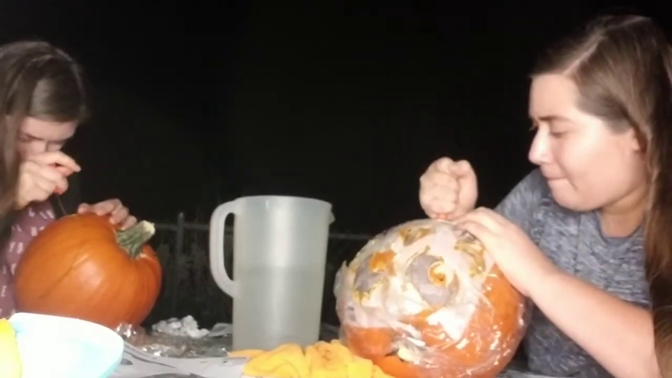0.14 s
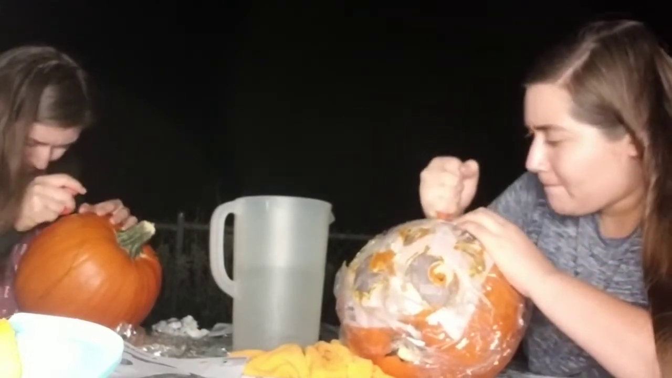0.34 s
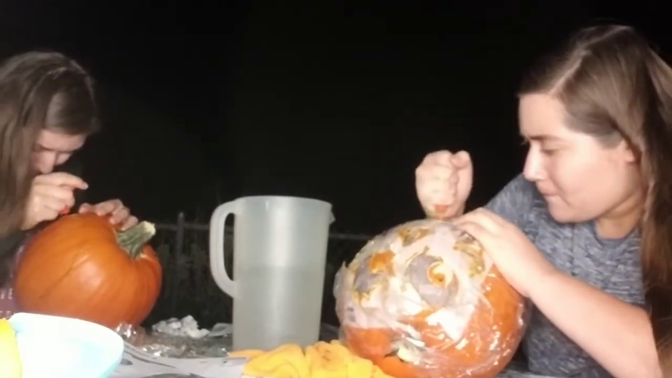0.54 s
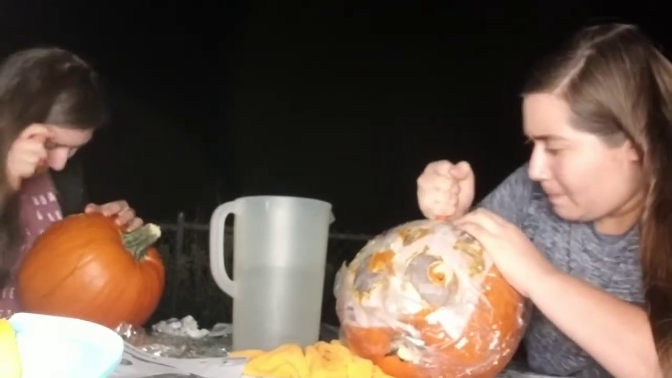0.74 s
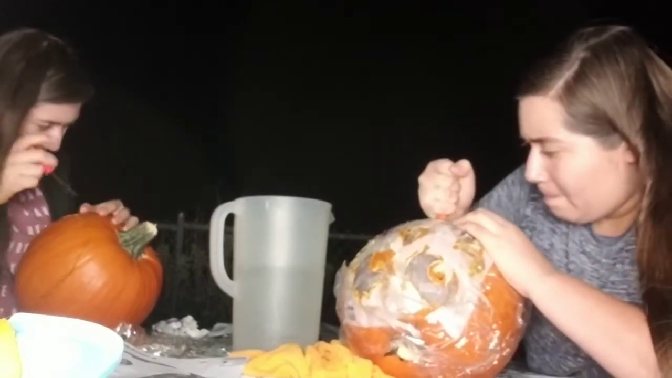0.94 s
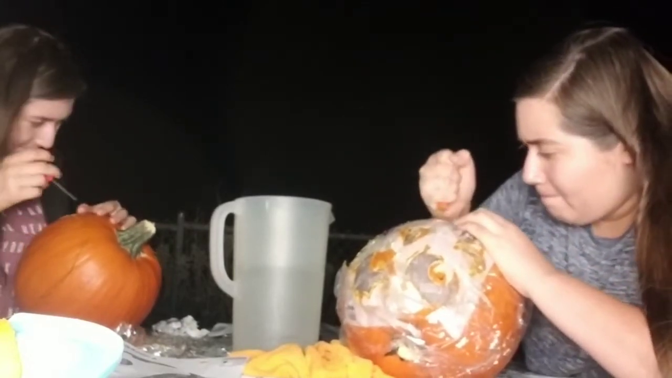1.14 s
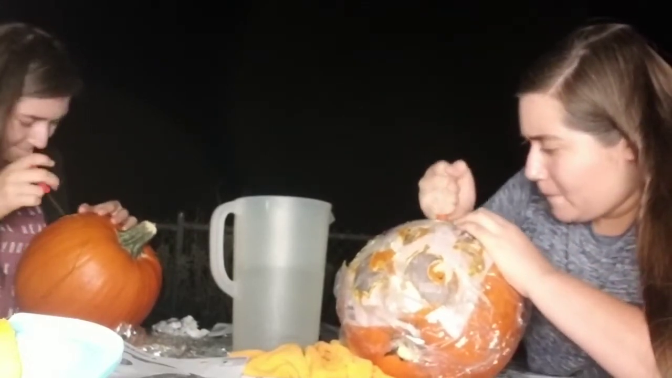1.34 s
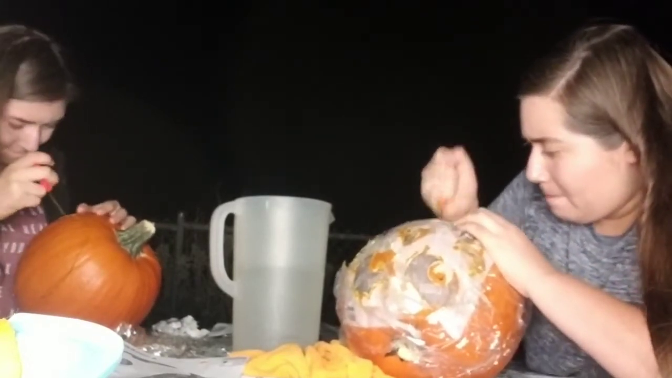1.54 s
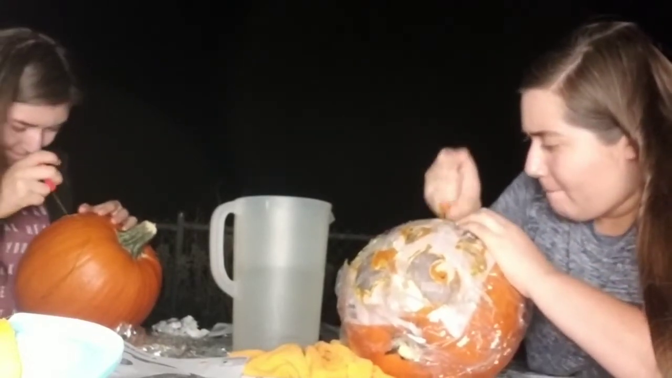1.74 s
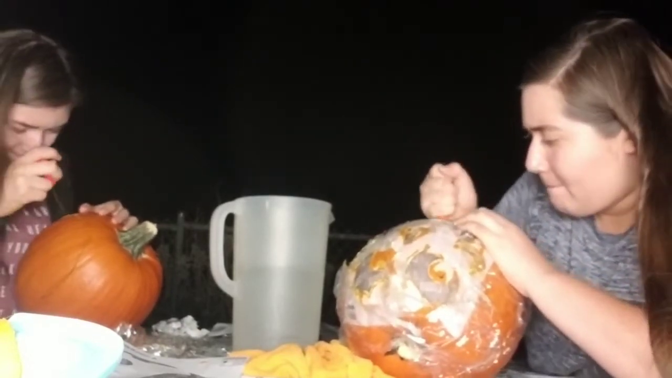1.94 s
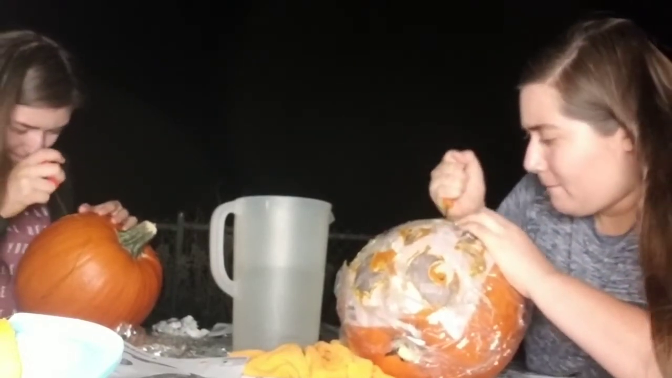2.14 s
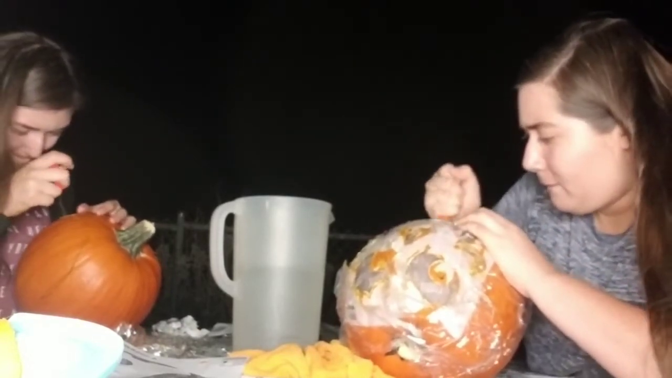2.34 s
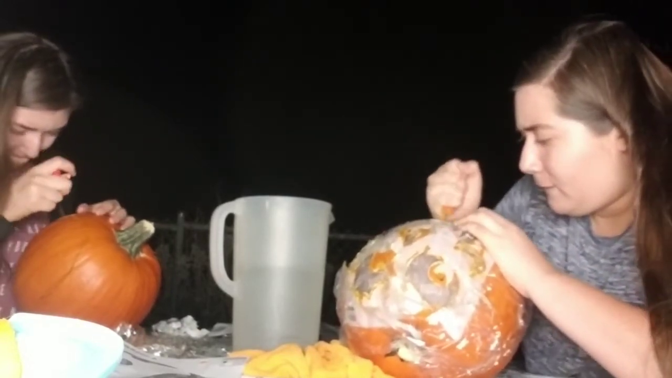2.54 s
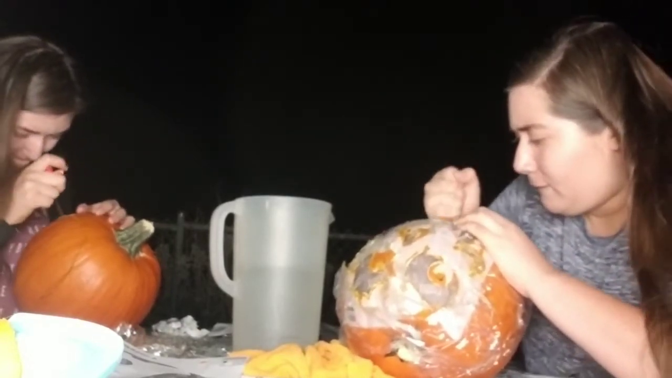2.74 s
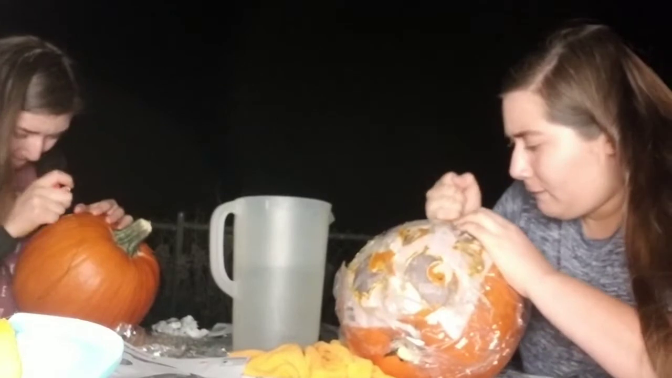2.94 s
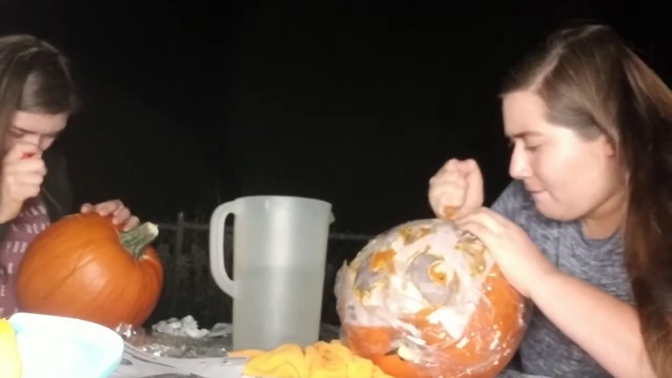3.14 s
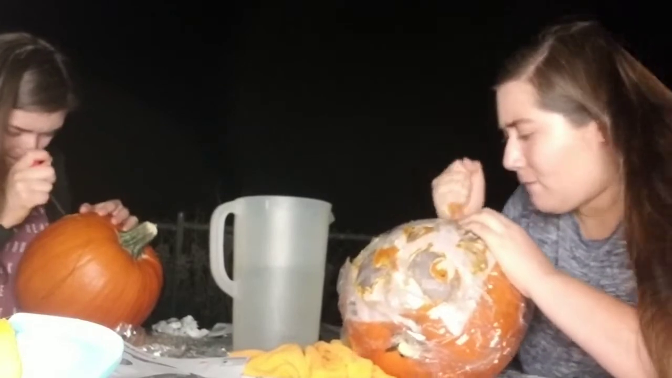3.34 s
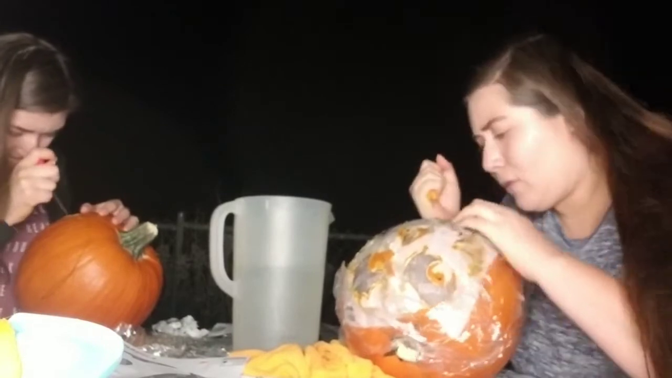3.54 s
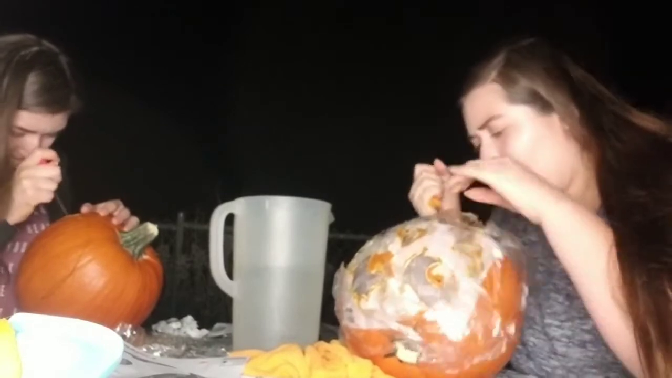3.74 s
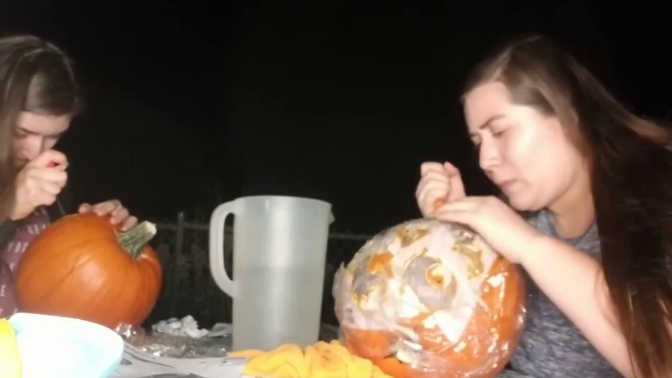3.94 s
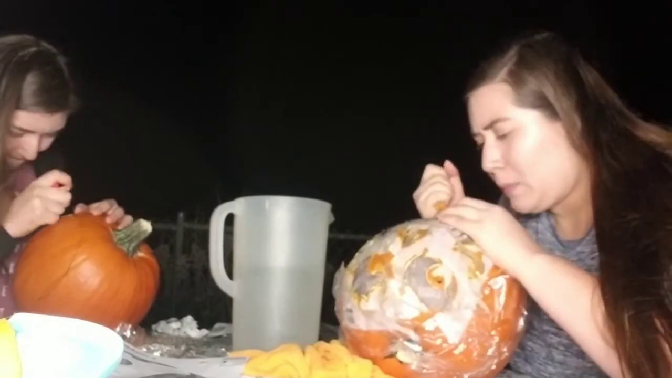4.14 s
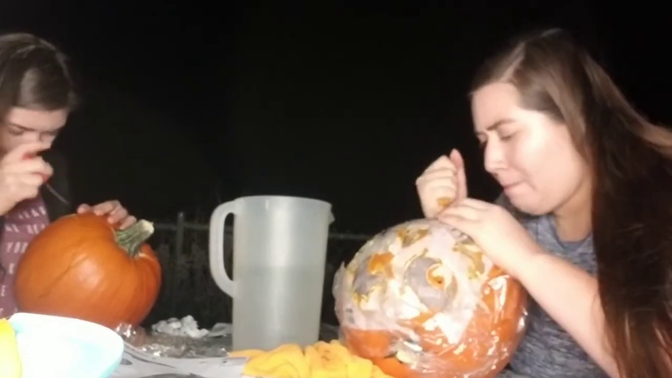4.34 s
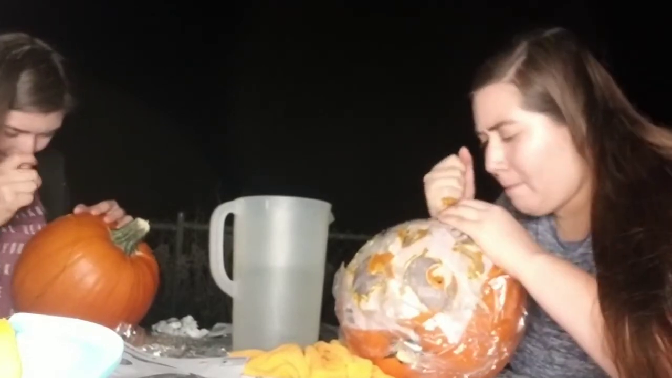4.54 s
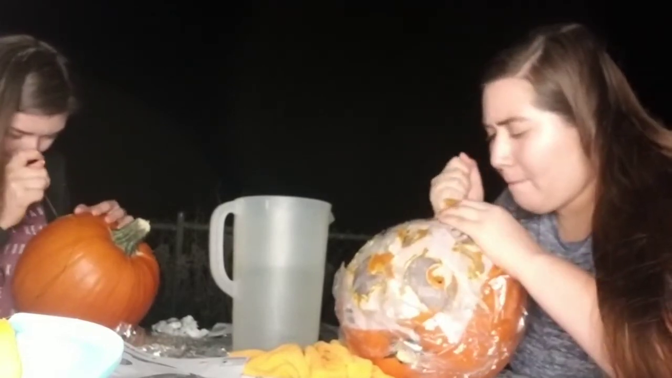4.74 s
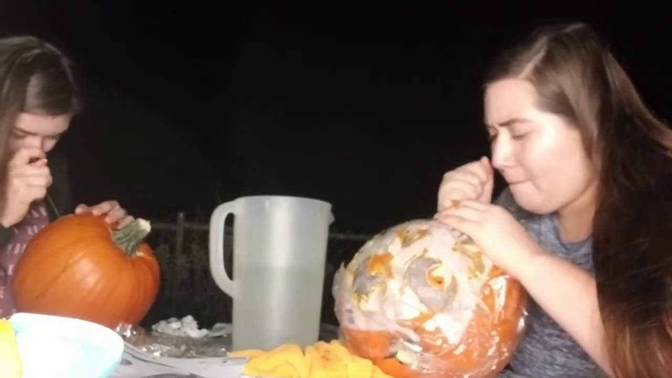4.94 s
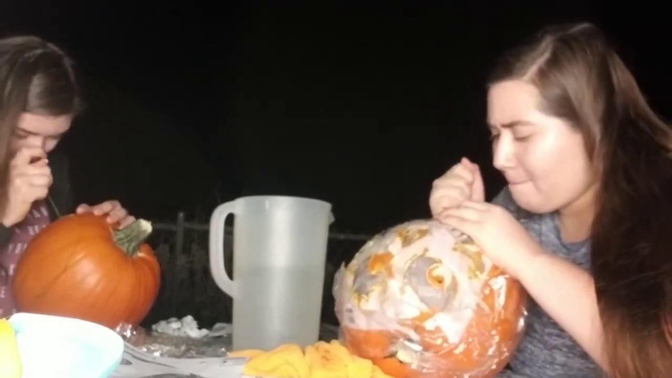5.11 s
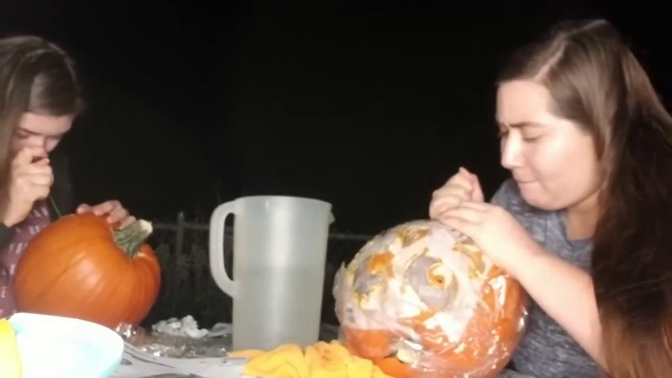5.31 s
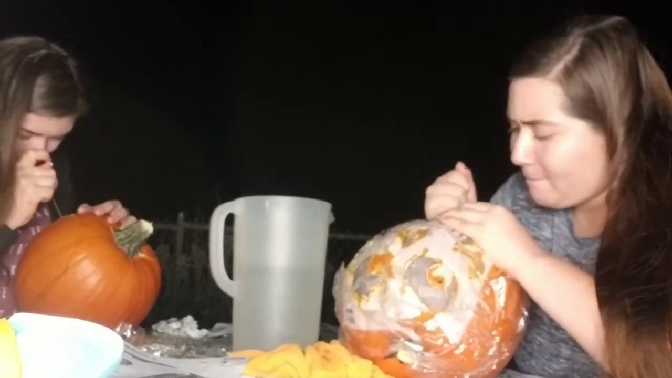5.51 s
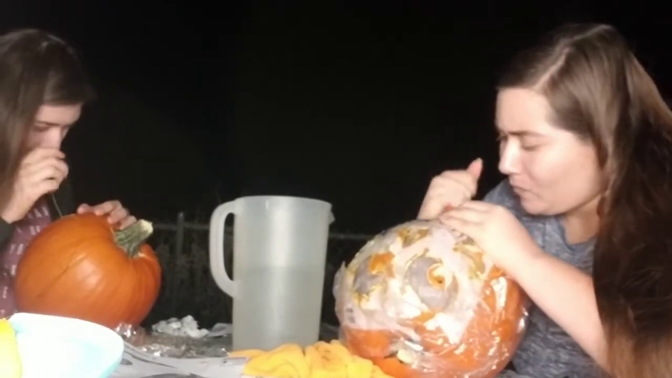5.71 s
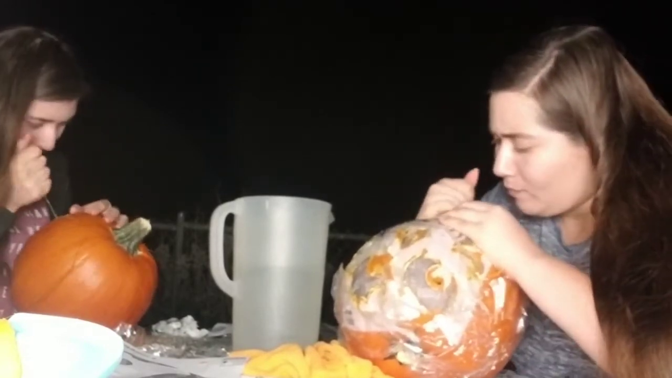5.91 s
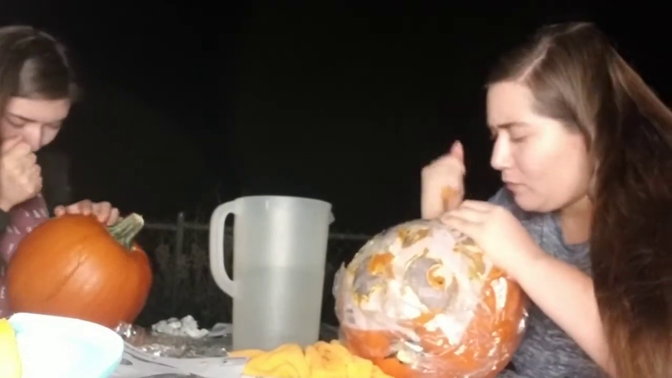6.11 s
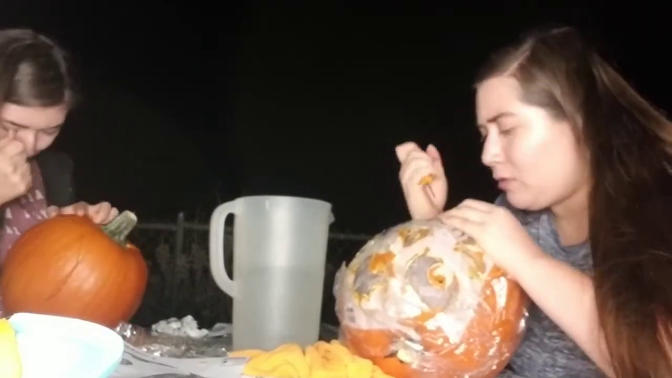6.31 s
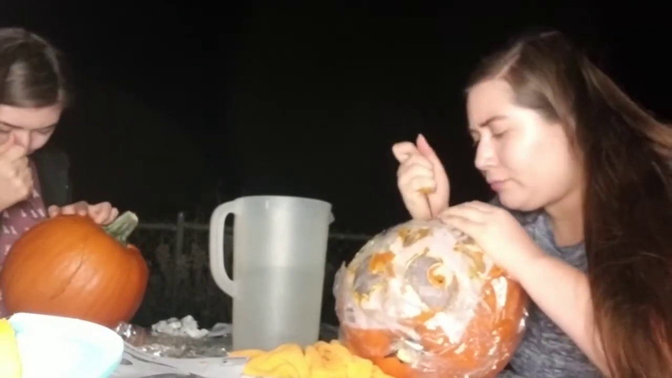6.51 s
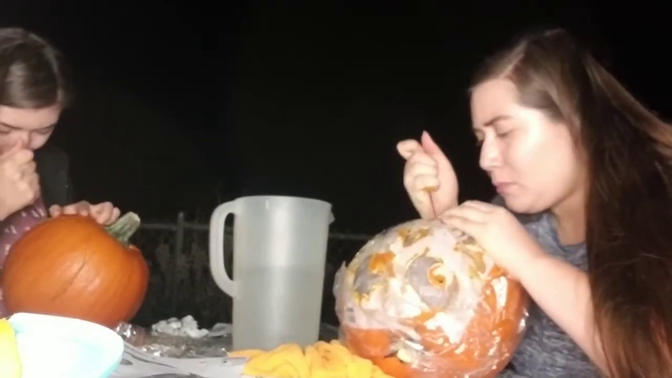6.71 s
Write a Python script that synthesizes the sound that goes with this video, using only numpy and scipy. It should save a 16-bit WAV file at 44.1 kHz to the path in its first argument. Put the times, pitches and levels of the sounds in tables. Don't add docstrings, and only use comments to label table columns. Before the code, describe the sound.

Close, dry stereo sound of pumpkin carving on an outdoor table. Uneven little saw strokes knock and rasp, swelling into a quick, woody-hollow run, then thinning. A cluster of crisp snaps and handling noises follows, then a mostly quiet gap with thin crickets and low distant rumble. Soft low rubs and several lighter saw strokes finish it, with no reverberation.

```python
import sys
import numpy as np
from scipy import signal
from scipy.fft import rfft, irfft, next_fast_len
from scipy.io import wavfile
from scipy.ndimage import uniform_filter1d

SR = 44100
rng = np.random.default_rng(int(sys.argv[2]) if len(sys.argv) > 2 else 0)


def int16_out(signal):
    q = np.round(np.clip(np.atleast_2d(signal).T, -1, 1) * 32767)
    wavfile.write(sys.argv[1], SR, q.astype(np.int16))


def linear_from_db(decibels):
    return 10 ** (np.asarray(decibels, float) / 20)


N = 298557
TIME = np.arange(N) / SR


def level(x, db):
    return x * linear_from_db(db) / np.sqrt(np.mean(np.abs(x) ** 2))


def ports(left_db, right_db):
    return linear_from_db(np.array([[left_db], [right_db]]))


def noise():
    return rng.standard_normal((2, N))


def ring(x, modes, shift=1):
    size = next_fast_len(x.shape[-1], real=True)
    hz = (np.arange(size // 2 + 1) * SR / size + 1e-9) / shift
    power = 0
    for mode_hz, width_hz, db in modes:
        detune = (hz / mode_hz - mode_hz / hz) * mode_hz / width_hz
        power = power + (linear_from_db(db) / (1 + 1j * detune) ** 2) ** 2
    return irfft(rfft(x, size) * np.sqrt(np.abs(power)), size)[..., :x.shape[-1]]


def walk(rate_hz, channels=1):
    k = int(SR / rate_hz)
    held = np.repeat(rng.standard_normal((channels, N // k + 1)), k, axis=1)
    return uniform_filter1d(uniform_filter1d(held, k), k)[:, :N]


def swell(centre_s, ms, edge, skirt_db=-60, rise=1.78):
    cut = slice(max(int((centre_s - ms / 250) * SR), 0), min(int((centre_s + ms / 250) * SR), N))
    u = (TIME[cut] - centre_s) * 2000 / ms
    core = .5 ** (np.abs(u) ** np.where(u < 0, rise * edge, edge))
    skirt = linear_from_db(skirt_db) * np.exp(-(u / 8.9) ** 2) * np.hanning(len(u))
    return cut, u, core + skirt


def patchy(x, modes, swing_db, shift=1):
    return level(sum(linear_from_db(db) * ring(x, [mode], shift) for mode, db in zip(modes, swing_db)), 0)


def bursts(rows, share):
    out = np.zeros((2, N))
    for (start_s, db, hz, ms), hiss in zip(rows, rng.standard_normal((len(rows), 2, SR))):
        cut, u, shape = swell(start_s + ms / 2000, ms, edge=1.75)
        buzz = ring(hiss[:, :len(u) + 2048], [(hz, share * hz, 0)])
        out[:, cut] += shape * level(buzz, db - 9.0)[:, :len(u)]
    return out


def loose(rows, scatter_rad):
    return .2 + scatter_rad * rng.standard_normal(len(rows))


LOOSE_SCATTER_RAD = .9


def drum(rows, wobble, edge, modes, rough_db):
    out, halo = np.zeros((2, N)), np.zeros(N)
    waver, uneven = wobble * walk(90)[0], linear_from_db(.9 * walk(120)[0])
    for centre_s, db, ms, start_hz, end_hz, lead_rad in rows:
        cut, u, shape = swell(centre_s, ms, edge, rise=1.17)
        hz = ((start_hz + end_hz) / 2 + (end_hz - start_hz) * np.tanh(u)) * (1 + waver[cut])
        phase = 2 * np.pi * np.cumsum(hz) / SR + lead_rad / 2 * np.array([[1], [-1]])
        out[:, cut] += np.sqrt(2) * linear_from_db(db) * shape * uneven[cut] * np.cos(phase)
        cut, u, shape = swell(centre_s, 1.88 * ms, edge=1.7)
        halo[cut] += linear_from_db(db) * shape
    rough = noise() + 0.89 * rng.standard_normal(N)
    return out + halo * level(ring(rough, modes), rough_db)


def glide(row, glide_hz, lead_rad):
    centre_s, db, ms, tooth_hz = row[:4]
    return centre_s, db, ms, tooth_hz - glide_hz / 2, tooth_hz + glide_hz / 2, lead_rad


# centre_s [s], level_db [dB], length_ms [ms], tooth_hz [Hz], glide_hz [Hz]
PUSHES = [(.172, -32, 19.3, 305.4, 7), (.226, -34.5, 11.5, 283.6, 3.5), (0.502, -35, 18, 235.6, -65.5),
          (0.525, -27, 11.6, 286, 26.5), (.82, -38, 10, 311.5, -4.5), (0.839, -35, 29.2, 328.2, 6.5),
          (1.153, -28.5, 22, 303.4, -40.5), (1.167, -34.5, 7, 212.6, -17),
          (1.392, -37.5, 27.8, 261.2, -0.5), (1.431, -29, 16.3, 288.3, 23.5),
          (1.447, -28.5, 8.4, 205, -29.5), (1.577, -37, 9.4, 310.5, -29), (1.593, -25.5, 13.9, 276.4, 40),
          (1.711, -28.5, 12.1, 234, -8.5), (1.723, -33, 8.4, 352, -14), (1.734, -33, 14.4, 270, 36),
          (1.968, -16, 20.4, 313.4, -12), (2.095, -18, 18.4, 300.5, 11), (2.207, -23.5, 22.8, 256.7, 34.5),
          (2.311, -32, 9.6, 341.4, -8), (2.323, -20.5, 18, 304.4, -37.5), (2.342, -41, 10, 326, -5),
          (2.457, -21, 19.2, 322, -2), (2.474, -37, 8.84, 331, -3), (2.722, -32.5, 17, 301.4, -3.5),
          (2.845, -24.5, 19, 222.7, -15.5), (3.09, -25.5, 16, 309.4, 26.5), (3.21, -31, 9.9, 264.6, 2),
          (3.223, -22, 16.8, 235.8, 21), (3.466, -28.5, 11, 274, -7), (3.478, -33.5, 7.7, 289.6, 0),
          (3.585, -21, 18.2, 221.3, -27.5), (3.606, -35, 10, 281, -24), (5.8115, -27, 12, 248.8, 9),
          (5.82, -28.5, 9.4, 311.6, 44.5), (6.006, -34, 6.1, 256, -4.5), (6.021, -27, 16.9, 268.4, -18),
          (6.164, -32, 20.7, 243.5, -30.5), (6.414, -30.5, 16.5, 201.9, -31)]
# centre_s [s], left_lead_rad [rad]
ROCKS = [(.5, -1.9), (2.322, -.4), (.525, -1.1), (1.43, .5), (1.448, 1.3), (1.968, -.8), (2.096, -2.2),
         (2.722, -1.3), (3.09, 2.4), (3.21, 2.1), (3.223, 1.6), (3.466, -.7), (3.478, -1.1), (6.164, .9),
         (6.414, -2)]
# centre_s [s], level_db [dB], length_ms [ms], tooth_hz [Hz]
PULLS = [(0.585, -50, 17, 324), (0.606, -48.5, 18.6, 246), (.623, -45.5, 22, 299.7),
         (.657, -39.5, 14.4, 261.3), (.691, -40, 13.2, 301.8), (0.787, -50, 31, 315.4), (1.1, -54, 24, 322),
         (1.539, -67, 28, 323), (1.676, -48.5, 25, 224), (1.917, -51.5, 15.6, 281), (2.055, -50, 30, 292.6),
         (2.256, -49, 12, 288), (2.425, -44.5, 24, 265), (2.542, -52, 16, 272.5), (2.701, -38, 15.5, 302),
         (2.786, -49.5, 16, 269), (2.812, -53, 13.7, 248), (3.17, -53, 12, 300), (3.442, -43.5, 14.3, 340),
         (5.994, -37.5, 8, 286), (2.932, -57, 22, 262), (2.973, -43, 14.2, 280), (3.287, -51, 13, 256),
         (3.352, -42, 5.7, 238), (4.468, -59, 16, 225), (4.479, -53.5, 16, 337.6), (4.49, -52, 14, 402),
         (4.515, -59, 12, 248.4), (4.61, -62.5, 25, 291.5), (3.265, -44, 13, 280), (0.924, -58, 30, 287.4),
         (4.501, -41.5, 6.5, 306), (5.402, -50, 15, 223.7), (5.515, -46.5, 21, 294.8),
         (5.683, -51.5, 7.5, 228.4), (5.847, -48, 16.5, 300), (6.118, -51, 29, 233.7),
         (6.494, -51, 55, 320)]
# pitch_hz [Hz], width_hz [Hz], level_db [dB]
SHELL = [(154, 26, -3.5), (222.6, 51, 0.5), (309.2, 48.7, 1.5), (371.4, 48, -7.5), (544, 84, -28.5)]


def bites():
    rocks = np.array(ROCKS)
    rocked = np.abs(np.array(PUSHES)[:, :1] - rocks[:, 0]) < .005
    leads = loose(PUSHES, scatter_rad=.15) + rocked @ rocks[:, 1]
    pushes = [glide(row, row[4], lead) for row, lead in zip(PUSHES, leads)]
    pulls = [glide(row, 11.8, lead) for row, lead in zip(PULLS, loose(PULLS, LOOSE_SCATTER_RAD))]
    return (drum(pushes, wobble=0.047, edge=2.63, modes=SHELL, rough_db=-16.0)
            + drum(pulls, wobble=0.082, edge=1.8, modes=SHELL, rough_db=-3.5))


# centre_s [s], length_ms [ms], level_db [dB], steel_over_rind_db [dB]
CUTS = [(0.173, 28, -69.5, 0), (0.233, 24, -67.5, -5), (0.511, 38, -60.5, 1.5), (0.607, 36, -70, 2.5),
        (0.644, 40, -61, 6.5), (0.683, 34, -68, 2.5), (0.836, 36.5, -64, 2), (1.109, 33, -68.5, 5.5),
        (1.157, 29, -65.5, -0.5), (1.395, 48, -72, 1.5), (1.444, 30, -64.5, 2), (1.593, 18, -59, -3),
        (1.725, 39, -61.5, 1), (1.972, 30, -60, 1), (2.099, 36, -61.5, 1.5), (2.21, 25.2, -57, 1),
        (2.325, 33, -61.5, 5), (2.461, 30, -63.5, 1.7), (2.712, 35, -65.5, 2.5), (2.85, 46, -64.5, 3),
        (2.972, 24, -69, 3.5), (3.09, 24, -65.5, -2.5), (3.221, 19, -61, -5.5), (3.281, 36, -68, 7.5),
        (3.353, 23.5, -65.5, -5), (3.478, 31, -69, -0.5), (3.589, 24, -62.5, -1), (5.521, 33, -66.5, 1),
        (5.819, 12.3, -61.5, -2.5), (5.845, 31, -64, -5), (5.999, 17, -75, 4.5), (6.021, 25.6, -61.5, -1.5),
        (6.16, 26, -68.5, 1.5), (6.415, 24, -67, 1)]
# centre_s [s], length_ms [ms], level_db [dB], steel_over_rind_db [dB]
WIPES = [(0.784, 27, -71, 2), (1.904, 33, -78.5, 3.5), (2.398, 55, -73, 2), (2.532, 49, -73, 2),
         (1.624, 27, -78, 3.5), (3.381, 28, -74.5, 7), (3.42, 38, -76, -0.5), (3.446, 7.6, -71.5, 14),
         (3.678, 18, -77.5, -0.5), (3.755, 84, -78.5, 4), (3.83, 79, -79.5, 1.5), (3.912, 28, -62, 5.5),
         (3.991, 125, -68, 6), (4.111, 51, -67, 1.5), (4.49, 41, -60.5, 3), (5.96, 65, -71.5, 1.5),
         (6.125, 25, -73, -6), (6.286, 11, -70, -4), (6.523, 33, -70, -1.5), (5.395, 42, -78, -3),
         (6.638, 22.6, -65.5, -3)]
# time_s [s], level_db [dB]
PLACE = [(.2, 3), (.5, 5), (1.0, -7), (1.5, -2), (2.1, 5.5), (2.5, 6), (2.9, 6), (3.15, 2.5), (3.6, 2.5),
         (5.6, -33), (5.83, -8.5), (6.02, -12), (6.6, -6)]
# pitch_hz [Hz], width_hz [Hz], level_db [dB]
RIND = [(1072, 136, -2), (1376, 112, 1), (515, 110, 2), (1676, 410, -19), (940, 79, -24.5)]
# pitch_hz [Hz], width_hz [Hz], level_db [dB]
FLESH = [(2700, 420, 4.5), (3140, 330, -4.5), (4150, 2100, 4.5), (4560, 930, -2.5), (2290, 200, -5.5)]
# pitch_hz [Hz], width_hz [Hz], level_db [dB]
STEEL = [(5440, 1100, 0.5), (6600, 560, -3.5), (7625, 880, 6), (9000, 1100, -3), (11600, 6000, -8.5)]


def scrape():
    out = np.zeros((2, N))
    fibres = rng.standard_normal((3, 2, N)) * linear_from_db(.55 * rng.exponential(size=N) + 2.6 * walk(400))
    fibres[0] += 0.32 * fibres[0].mean(axis=0)
    flicker_db = (3.5 * walk(70, channels=15) + 2 * walk(25, channels=15)).reshape(3, 5, N)
    rows = [(*row, 0) for row in CUTS] + [(*row, -3) for row in WIPES]
    for (centre_s, ms, db, tilt_db, dull_db), chance in zip(rows, rng.standard_normal((len(rows), 3))):
        rind_db, flesh_db, steel_db = db - tilt_db + dull_db, db + 0.7, db + tilt_db - 1.74
        place_db = np.interp(centre_s, *np.transpose(PLACE))
        low, body, third = RIND[:3]
        rind = [(low[0], low[1], place_db), body, (third[0], third[1], third[2] + 0.19 * place_db)] + RIND[3:]
        top_hz, top_width_hz, top_db = STEEL[-1]
        steel = STEEL[:-1] + [(top_hz, top_width_hz, top_db + .5 * (steel_db - flesh_db))]
        cut, u, shape = swell(centre_s, ms, edge=2.14, skirt_db=-18.5)
        for k, (modes, part_db) in enumerate(((rind, rind_db), (FLESH, flesh_db), (steel, steel_db))):
            sound = patchy(fibres[k][:, cut], modes, flicker_db[k][:, cut], shift=1 + 0.043 * chance[k])
            out[:, cut] += linear_from_db(part_db) * shape * sound
    return out * ports(-1.5, 1.5)


# start_s [s], peak_db [dB], pitch_hz [Hz], length_ms [ms]
RINGS = [(.495, -54, 1037, 35), (1.385, -58.5, 1400, 60), (1.575, -50, 1360, 27), (1.705, -56, 1380, 26),
         (1.955, -52.5, 1310, 28), (2.41, -60, 1430, 15), (2.695, -59.5, 1384, 38), (2.825, -54, 1370, 18),
         (3.575, -54, 1280, 28), (3.895, -56, 2950, 9.3), (6.005, -46.5, 1320, 18.6),
         (.49, -48.5, 2930, 37), (.5, -51, 3960, 26), (.618, -51.5, 2930, 64), (.82, -58, 2400, 28),
         (1.095, -58, 3000, 22), (1.15, -50.5, 2410, 14), (1.36, -60.5, 2630, 44), (2.315, -51, 4020, 27),
         (2.32, -53, 2700, 17.4), (2.445, -51, 3880, 24), (2.455, -50.5, 2700, 27),
         (2.695, -54.5, 3820, 30), (2.71, -59, 2780, 26), (3.265, -61, 3200, 30), (5.806, -52.5, 2780, 22),
         (5.835, -51, 2470, 15), (5.935, -64, 1390, 40), (6.01, -48, 2700, 21), (6.157, -54, 5400, 16),
         (6.278, -61, 2930, 13), (6.278, -66, 1430, 13), (6.402, -60.5, 2700, 25), (6.402, -51, 5270, 18.5),
         (6.512, -52, 4430, 22), (6.632, -54, 2380, 17)]


def tooth_rings():
    return bursts(RINGS, share=0.097)


# centre_s [s], level_db [dB]
JOLTS = [(0.235, -43), (0.534, -45), (0.657, -51), (0.832, -37), (1.151, -41), (1.256, -54.5), (1.439, -40),
         (1.598, -42), (1.724, -39), (1.919, -52.5), (1.979, -46.5), (2.074, -54.5), (2.198, -47),
         (2.443, -53), (2.982, -53.5), (3.093, -56), (3.234, -55.5), (3.351, -46.5), (3.481, -32.5),
         (3.503, -41.5), (3.596, -50.5), (3.67, -53.5), (3.898, -52.5), (3.953, -52), (4.018, -53.5),
         (4.583, -52.5), (5, -57), (5.408, -51.5), (5.63, -55), (5.819, -42), (5.931, -54), (6.165, -43.5),
         (6.296, -56), (6.413, -43)]


def table_jolts():
    table_hz = 105.18
    leads = loose(JOLTS, 1.4 * LOOSE_SCATTER_RAD)
    rows = [(s, db, 32 - 0.93 * (db + 44.5), table_hz, table_hz, lead) for (s, db), lead in zip(JOLTS, leads)]
    return drum(rows, wobble=0.046, edge=2.3, modes=[(table_hz, 60, 0), (170, 60, -6)], rough_db=-6.5)


# start_s [s], peak_db [dB], centre_hz [Hz]
SNAPS = [(0.227, -47, 2600), (.819, -56, 2980), (3.676, -47, 5140), (3.7227, -46, 6500),
         (3.8057, -38.5, 6700), (3.9018, -40, 6650), (3.9063, -41, 1980), (3.915, -33, 6500),
         (3.9327, -36, 9130), (3.9468, -37, 7200), (3.966, -52, 6500), (3.983, -43, 6000),
         (4.0092, -38, 6500), (4.095, -41, 7900), (4.105, -50, 9000), (4.115, -39.5, 9270),
         (4.13, -53, 9560), (4.4682, -61, 4800), (4.477, -56.5, 7000), (4.5022, -37, 8300),
         (5.871, -55, 8000), (5.889, -52, 7500), (6.518, -49, 4500)]


def snaps():
    out, t = np.zeros((2, N)), np.arange(300) / SR
    rise = t * 1000 / .5
    shape = rise * np.exp(1 - rise)
    partials = ((.6, .76), (1, 1), (.6, 1.24), (.3, 1.5))
    for (start_s, db, hz), turns in zip(SNAPS, rng.uniform(0, 2 * np.pi, (len(SNAPS), 4, 2, 1))):
        i = int(start_s * SR)
        cluster = sum(g * np.sin(2 * np.pi * ratio * hz * t + turn) for (g, ratio), turn in zip(partials, turns))
        out[:, i:i + 300] += linear_from_db(db - 10.5) * shape * cluster
    return out


# start_s [s], peak_db [dB], pitch_hz [Hz], length_ms [ms]
SQUEAKS = [
    (.028, -67, 2200, 34),
    (.059, -64.5, 1490, 25),
    (1.805, -60, 3600, 17),
    (3.664, -49.5, 2910, 16),
    (3.699, -60, 3240, 41),
    (3.802, -62, 2130, 28),
    (4.209, -65, 3520, 33),
    (5.56, -59.5, 625, 80),
    (5.85, -60.5, 610, 71),
]


def squeaks():
    return bursts(SQUEAKS, share=0.15)


# time_s [s], level_db [dB]
HANDS = [(0, 4.5), (.22, 8.5), (.53, -35), (.68, 6), (.9, 1), (1.39, -52), (1.55, -2.5), (1.94, -3.5),
         (2.13, 5.5), (2.36, 6.5), (2.53, -2), (3.04, 4.5), (3.47, 10), (3.94, 4), (4.54, -5), (5.07, -3.5),
         (6.03, 1.5), (6.77, 4.5)]


def hands_db():
    return np.interp(TIME, *np.transpose(HANDS))


def rub(busy_db):
    return linear_from_db(-66.5 + busy_db) * patchy(noise(), SHELL, 4.6 * walk(25, channels=5))


def rustle(busy_db):
    return linear_from_db(-87 + 1.07 * busy_db + 1.6 * walk(54)) * level(ring(noise(), STEEL + FLESH), 0)


# pitch_hz [Hz], width_hz [Hz], level_db [dB]
CRICKETS = [(4285, 76, -1.5), (4472, 71, -1), (4665, 89, -3.5)]
# centre_s [s], length_ms [ms]
LULLS = [(.222, 63), (.4, 88), (.765, 54), (.99, 116), (1.24, 86), (1.375, 89), (1.659, 52), (2.534, 59),
         (2.95, 45), (3.06, 61), (3.155, 36), (4.12, 38), (4.235, 88), (4.385, 60), (4.56, 49), (4.72, 41),
         (4.8, 84), (4.88, 22), (4.98, 110), (5.07, 21), (5.161, 49), (5.285, 61), (5.36, 26), (5.46, 50),
         (5.7, 92), (5.875, 46), (6.07, 72), (6.26, 130), (6.465, 36), (6.575, 9.7), (6.72, 61)]
# start_s [s], peak_db [dB], pitch_hz [Hz], length_ms [ms]
CHIRPS = [(.05, -65, 4230, 27), (.14, -61, 4460, 31), (.27, -68, 4370, 70), (.67, -54, 4250, 37),
          (.875, -62, 4330, 30), (1.09, -63, 4300, 32), (1.29, -70, 4240, 50), (1.5, -72, 4300, 37),
          (1.87, -64, 4310, 33), (2.38, -64, 4500, 20), (2.575, -66, 4260, 20), (3.0, -66.5, 4290, 20),
          (3.42, -60, 4300, 51), (3.62, -61.5, 4300, 38), (4.28, -72, 4270, 30), (4.325, -68, 4530, 25),
          (4.59, -64, 4490, 40), (4.61, -69, 4230, 40), (4.695, -68, 4250, 27), (4.83, -69, 4500, 32),
          (4.88, -65.5, 4270, 45), (5.03, -65, 4340, 22), (5.1, -69, 4270, 34), (5.19, -73, 4320, 58),
          (5.225, -71, 4440, 35), (5.31, -66.5, 4280, 46), (5.59, -70, 4500, 35), (5.915, -57, 4350, 44),
          (6.33, -64, 4380, 54), (6.46, -60, 4370, 25)]


def crickets():
    gate = np.ones(N)
    for centre_s, ms in LULLS:
        cut, u, shape = swell(centre_s, ms, edge=5.9)
        gate[cut] *= 1 - np.clip(0.65 * shape, 0, 1)
    chorus = sum(linear_from_db(mode[2] + 2.6 * walk(18)) * level(ring(noise(), [mode]), 0) for mode in CRICKETS)
    return gate * level(chorus, -75) + bursts(CHIRPS, share=.025) * ports(2.0, -1.9)


# start_s [s], peak_db [dB], pitch_hz [Hz], length_ms [ms]
TICKS = [(0.0494, -64.5, 6850, 48), (0.9294, -62, 7540, 19), (0.9892, -62, 7330, 24),
         (1.8093, -59.5, 7100, 47), (2.5885, -61, 7200, 19), (2.6618, -55, 7200, 19),
         (2.6968, -57, 7640, 20), (3.512, -56, 7960, 5.8), (4.1859, -58.5, 7300, 25),
         (4.1994, -60.5, 5900, 33), (4.56, -61, 6940, 30)]


def insect_ticks():
    return bursts(TICKS, share=0.051)


# time_s [s], level_db [dB]
TRAFFIC = [(0, -1), (.53, 2.5), (0.902, 0.5), (1.5, 1), (2.359, 0.5), (3.04, -3.5), (3.469, 0.5),
           (4.54, 1.8), (4.832, -0.5), (5.068, 5.5), (5.56, -0.5), (6.029, 4), (6.22, -3), (6.77, 2.5)]


def traffic_db():
    return np.interp(TIME, *np.transpose(TRAFFIC))


def drone(rumble_db):
    hz = 82 * (1 + 0.0989 * walk(5)[0])
    phase = 2 * np.pi * np.cumsum(hz) / SR + np.array([[.5], [-.5]])
    return linear_from_db(-66.5 + 1.5 * rumble_db + 2.8 * walk(9.5, channels=2)) * np.sin(phase)


# pitch_hz [Hz], density_db [dB per Hz]
NIGHT = [(20, -23), (50, -14.5), (90, -6.5), (130, -18), (250, -24.5), (450, -36), (800, -47.5),
         (2000, -50), (6000, -52), (15000, -53.5)]


def night(rumble_db):
    hz = np.arange(N // 2 + 1) * SR / N + 1
    knot_hz, knot_db = np.transpose(NIGHT)
    colour = linear_from_db(np.interp(np.log(hz), np.log(knot_hz), knot_db))
    colour = colour * linear_from_db(-57.5) / np.sqrt(2 * np.sum(colour ** 2) / N)
    air = rfft(noise() + 0.31 * rng.standard_normal(N)) * colour
    low = 1 / (1 + (hz / 200) ** 4)
    gust = linear_from_db(rumble_db - np.mean(rumble_db) + 1.5 * walk(6.0, channels=2) + 1.5 * walk(8.2))
    return gust * irfft(air * low, N) + irfft(air * (1 - low), N)


def scene():
    busy_db, rumble_db = hands_db(), traffic_db()
    low = bites() + rub(busy_db) + table_jolts() + night(rumble_db)
    high = tooth_rings() + snaps() + squeaks() + rustle(busy_db) + insect_ticks()
    mix = low * ports(-.95, .95) + high * ports(-2.1, 1.6)
    return mix + scrape() + crickets() + drone(rumble_db)


def band_limit(x):
    return signal.sosfilt(signal.butter(12, 14440, fs=SR, output="sos"), x)


def record(dry):
    top_cut = signal.ellip(10, .2, 40, 14500, fs=SR, output="sos")
    mix = signal.sosfiltfilt(top_cut, dry)
    return band_limit(mix)


dry = scene()
out = record(dry)
int16_out(out)
```